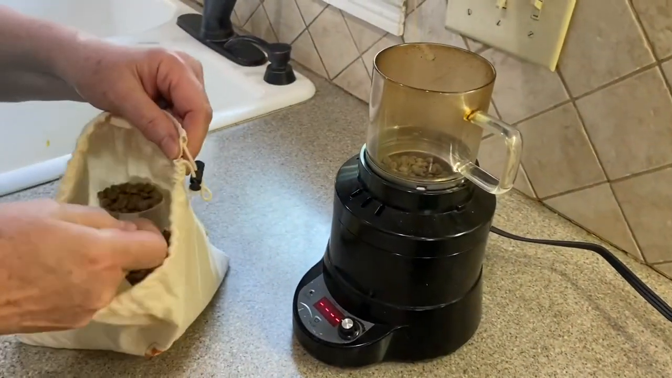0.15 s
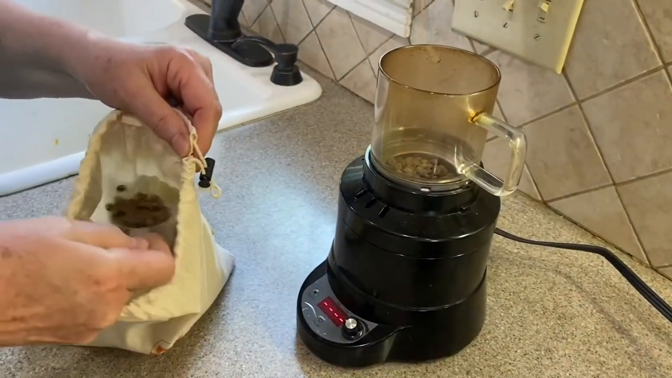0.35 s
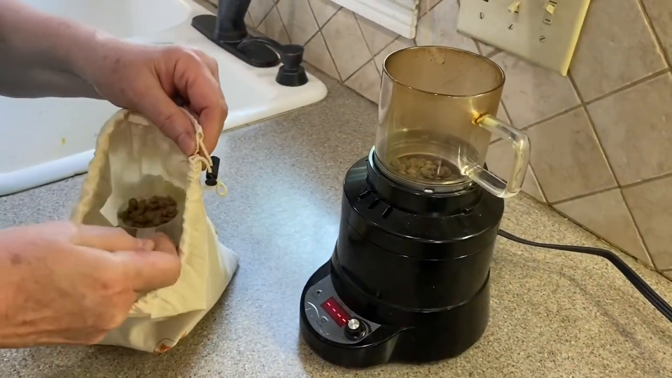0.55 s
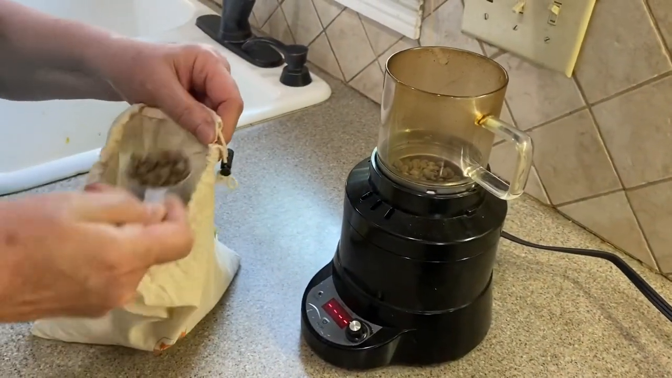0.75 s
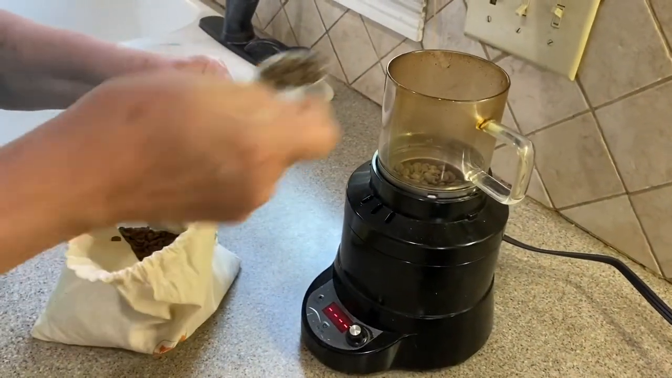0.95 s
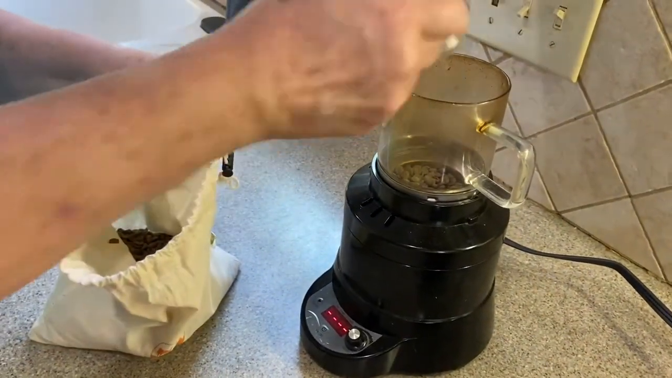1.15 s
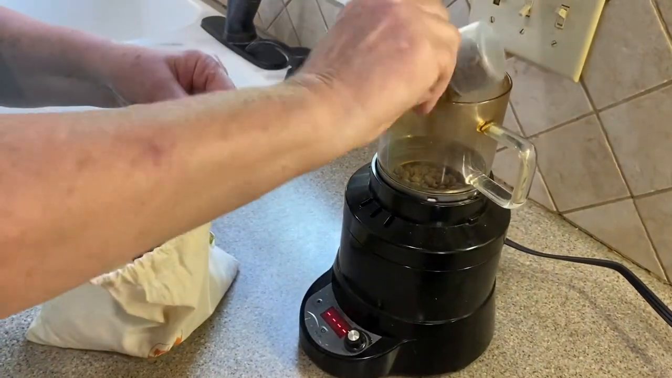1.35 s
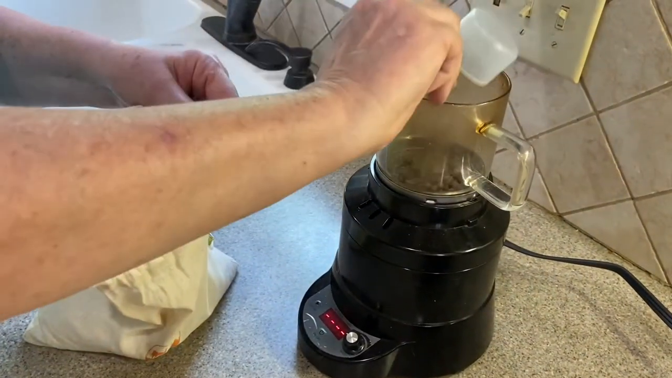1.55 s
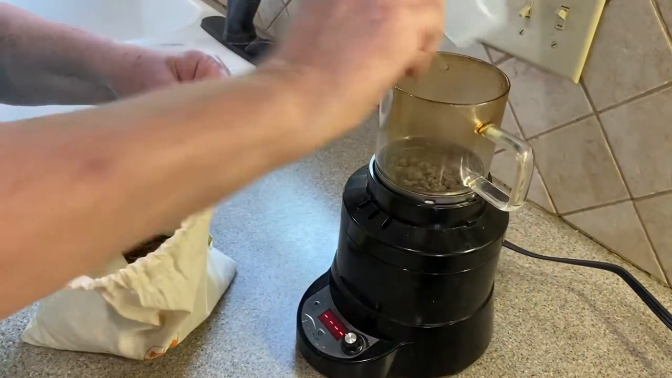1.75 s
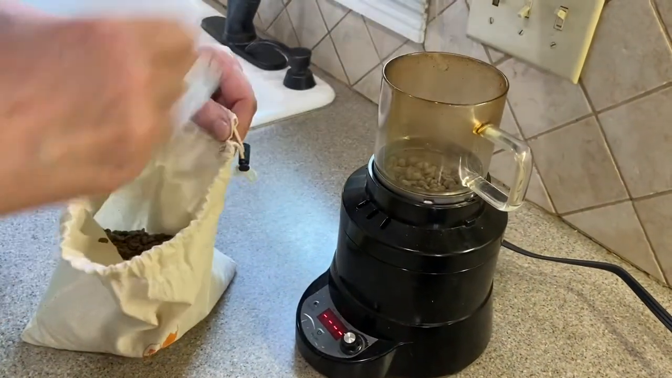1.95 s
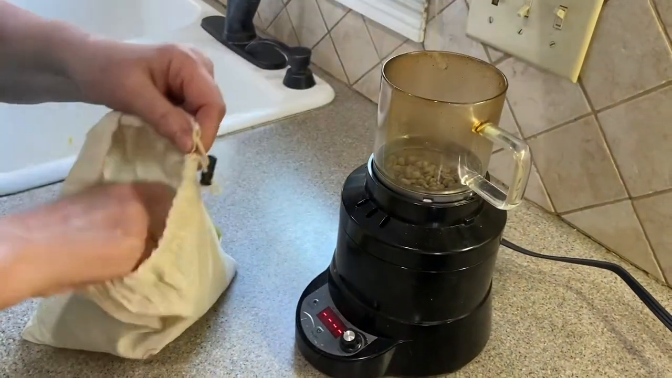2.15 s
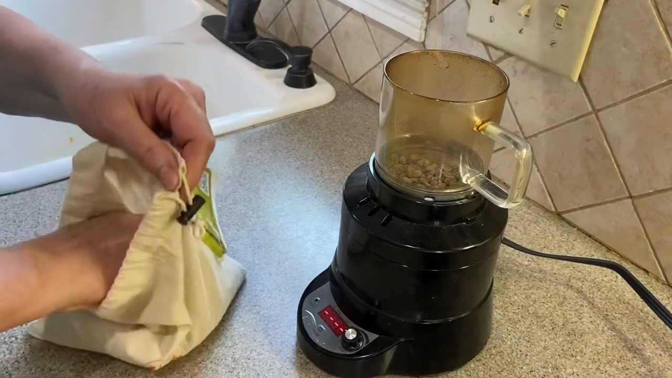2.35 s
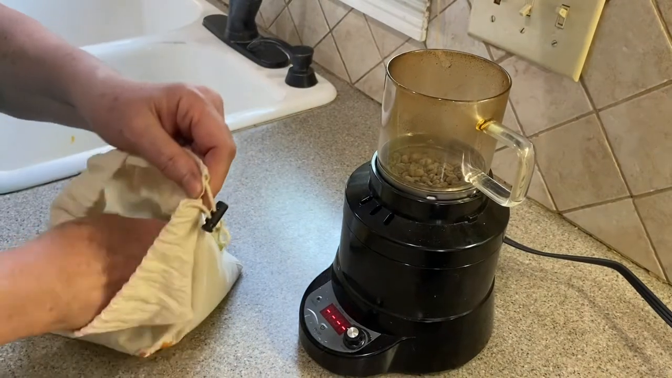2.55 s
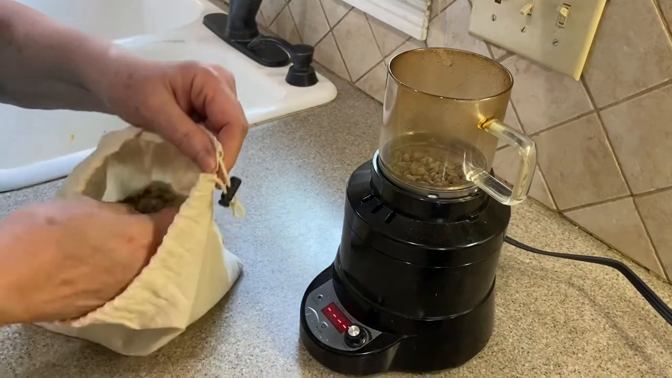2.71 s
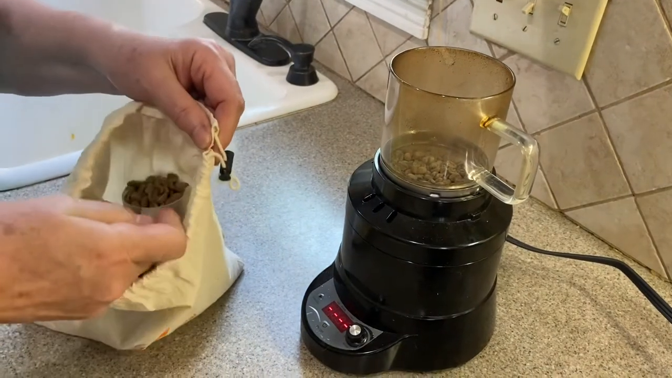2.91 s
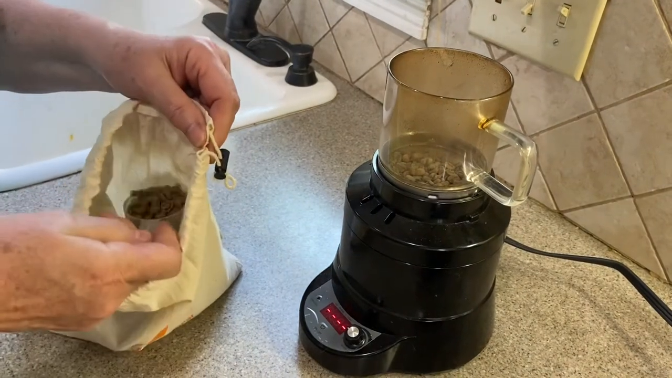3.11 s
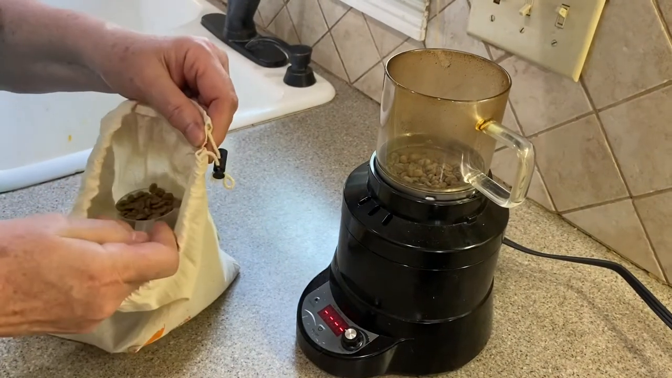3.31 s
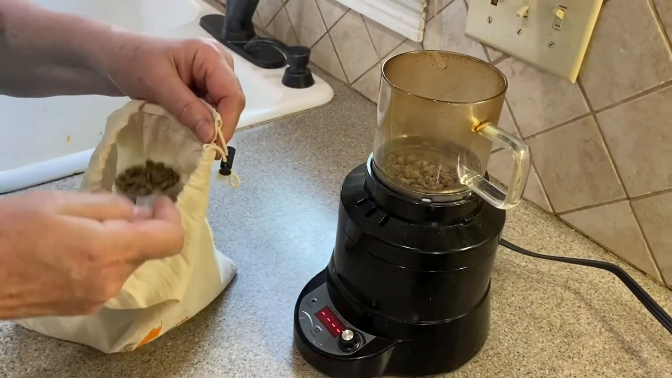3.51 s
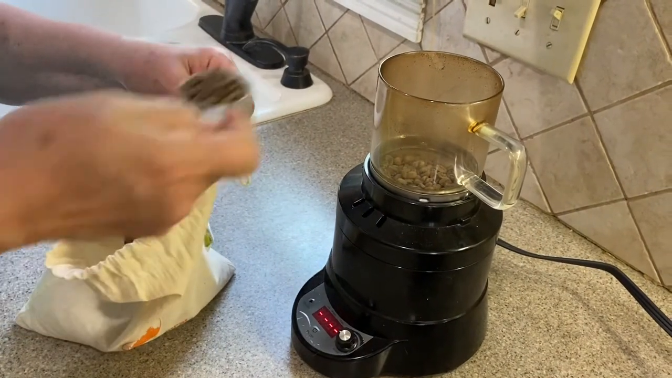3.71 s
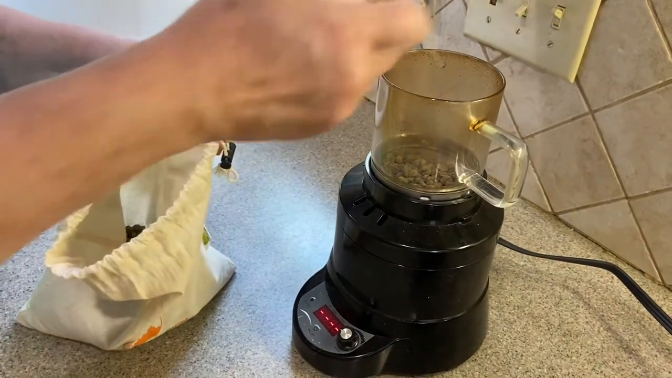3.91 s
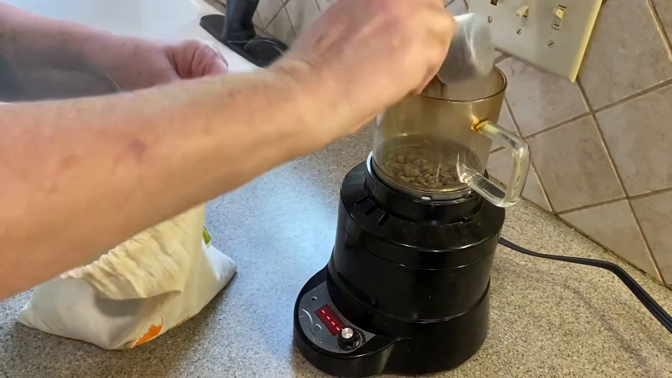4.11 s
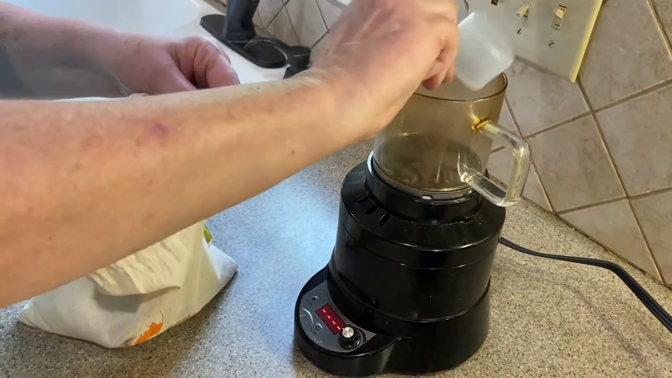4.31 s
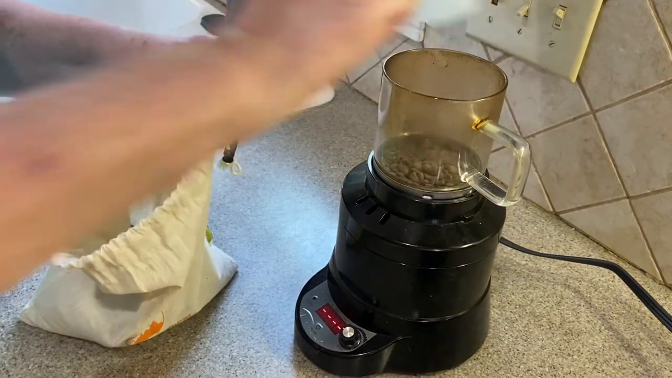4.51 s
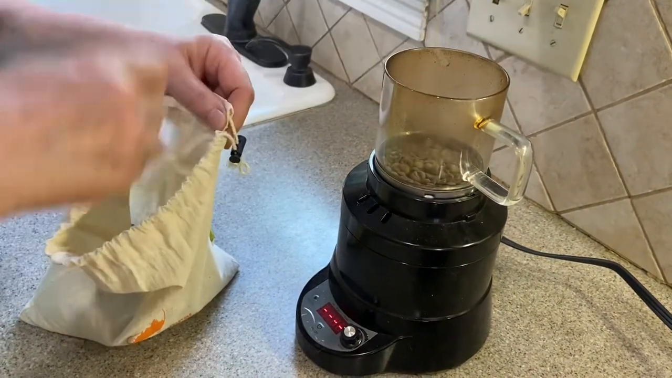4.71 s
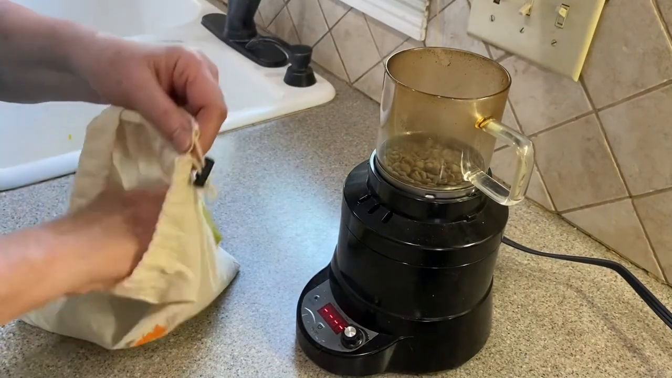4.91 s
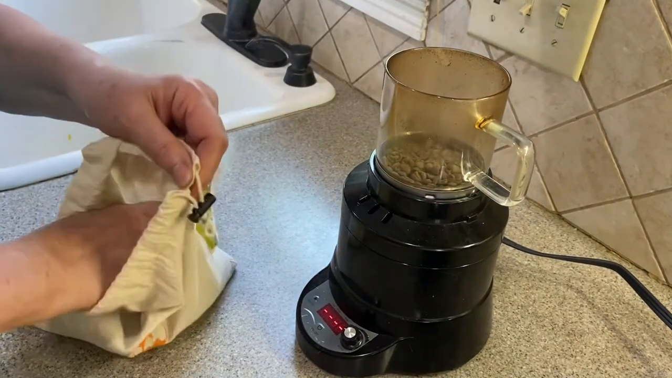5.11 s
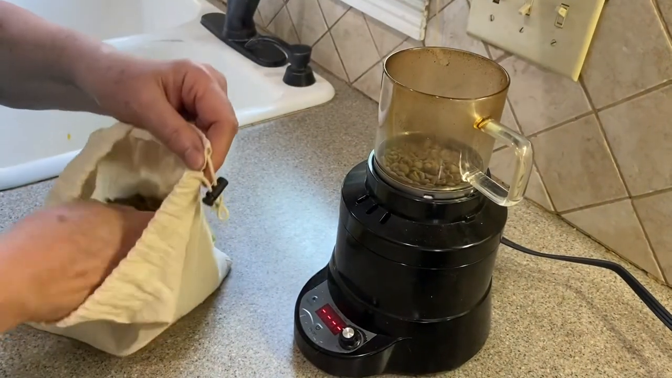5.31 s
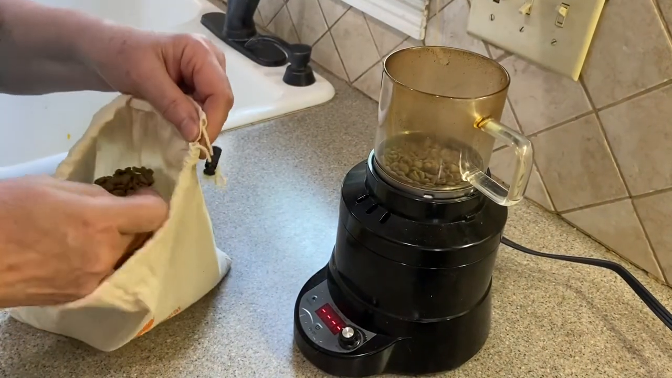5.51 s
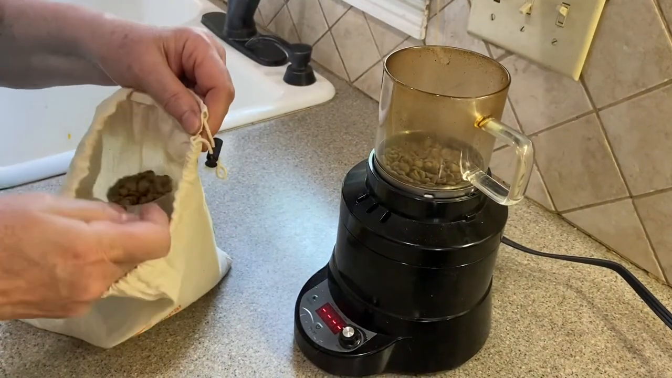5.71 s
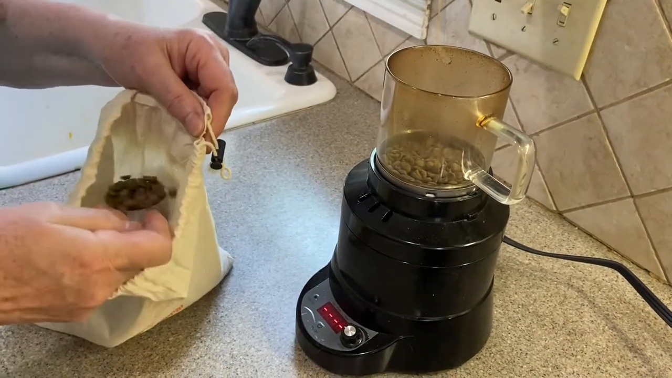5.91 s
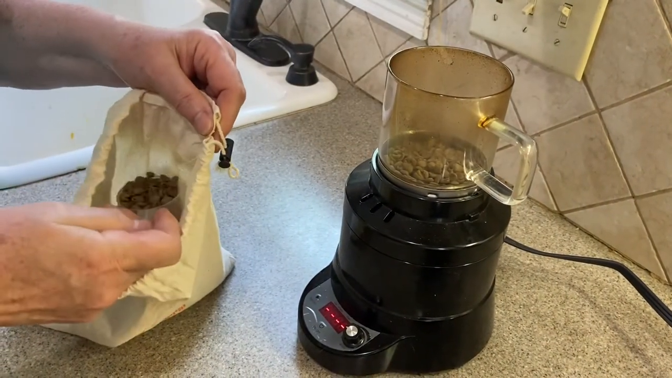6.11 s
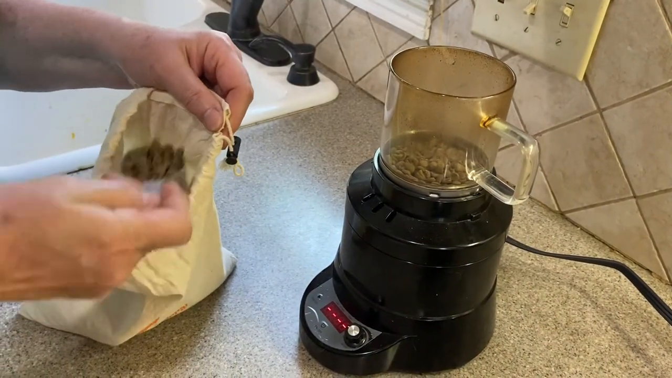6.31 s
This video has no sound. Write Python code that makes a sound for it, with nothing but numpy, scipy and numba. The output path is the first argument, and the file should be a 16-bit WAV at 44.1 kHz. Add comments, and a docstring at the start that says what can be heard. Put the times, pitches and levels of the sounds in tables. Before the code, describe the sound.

Raw coffee beans tick drily as they are shaken off a plastic scoop into a cloth bag. The scoopful gushes into a glass roasting chamber with a short, bright, ringing clatter. The scoop digs back in with a hollow crunch, the bag bumps the counter, and more beans trickle off. A second pour, a second dig and a last shake follow. A fridge hums faintly in the kitchen, heard through a phone microphone.

```python
"""Raw coffee beans in a kitchen, over a humming fridge. Spare beans are shaken off a plastic scoop and
tick back onto the heap in a rustling cloth bag. The scoop tilts and jolts, and at 1.4 s its load gushes
into a glass roasting chamber, ringing the wall. At 2.2 s it digs in with a hollow crunch; the bag bumps
the counter and more beans are shaken off. A second pour comes at 4.2 s, a second dig at 4.9 s, then a
last shake. The room adds a short tail, and all is heard through a phone's two microphone ports."""
import sys
import numpy as np
from scipy import signal
from scipy.fft import rfft, irfft
from scipy.io import wavfile
from numba import njit

SR = 44100
rng = np.random.default_rng(int(sys.argv[2]) if len(sys.argv) > 2 else 0)


def transcribe(signal):
    """Save signal, clipped to [-1, 1], as a 16-bit WAV file at the path in sys.argv[1]."""
    frames = np.atleast_2d(signal).T
    limited = np.clip(frames, -1, 1)
    pcm = np.round(limited * 32767).astype(np.int16)
    wavfile.write(sys.argv[1], SR, pcm)


N = 280255

# Levels in the tables are relative: each layer is filtered and trimmed in its function.
# wavering partials of the fridge: pitch_hz, width_hz, level_db
FRIDGE_HUM = [(57.2, 7.8, -59.5), (90, 4.1, -67.5), (112.7, 3.1, -60), (134, 9.6, -76), (195.5, 19, -67),
              (247.6, 6, -68), (296, 5, -71.5)]
# tone of the room's air: pitch_hz, gain_db
AIR_EQ = [(25, -42), (45, -0.5), (100, -0.5), (300, -9.5), (600, -18.5), (1500, -28.5), (2200, -23),
          (3000, -29.5), (7000, -41), (11000, -54), (16000, -63.5)]

# spare beans are shaken off the scoop: start_s, hold_s, level_db
BEAN_SHAKES = [(0.0, 0.0084, -52), (0.404, 0.026, -47.5), (3.187, 0.088, -49.5), (5.472, 0.011, -56.5),
               (5.86, 0.13, -54), (6.13, 0.031, -59.5)]
# single beans land on the heap: start_s, level_db
BEAN_DROPS = [(0.025, -45.5), (0.1182, -46), (0.2067, -41), (0.2748, -55), (0.299, -36.5), (0.316, -37.5),
              (0.3597, -53), (0.379, -31), (0.4262, -38), (0.4424, -33), (0.47, -37.5), (0.506, -41.5),
              (0.5793, -46), (0.642, -39.5), (0.753, -53), (1.191, -54), (1.229, -41.5), (1.263, -47),
              (1.3092, -36.5), (1.919, -51.5), (2.9164, -40.5), (2.96, -39.5), (2.992, -41.5), (3.014, -39),
              (3.047, -42), (3.106, -47), (3.129, -37), (3.1896, -35), (3.2076, -33), (3.255, -46),
              (3.2942, -34), (3.3536, -45.5), (3.4524, -51), (3.5308, -50), (3.6841, -41.5),
              (3.7426, -47.5), (4.042, -42.5), (4.0755, -64.5), (5.4954, -42), (5.554, -41), (5.605, -47),
              (5.672, -47), (5.6952, -44), (5.706, -42.5), (5.8103, -41.5), (5.8508, -35.5), (5.87, -40),
              (5.9007, -35), (5.914, -41), (5.9412, -35), (6.013, -36), (6.041, -44), (6.0513, -36),
              (6.1837, -36)]
# the cloth brushes against hand and sleeve: peak_s, level_db, fall_db_per_s
CLOTH_BRUSHES = [(0.69, -65, 121), (1.8, -62.5, 47), (3.5, -61.5, 11.5), (4.6, -66, 5.5)]
# the scoop tilts and its load slides to the lip: start_s, hold_s, level_db
SCOOP_TILTS = [(1.231, 0.11, -54.5), (4.08, 0.13, -50.5)]
# tone of the heap's surface and the cloth: pitch_hz, gain_db
HEAP_EQ = [(300, -25), (700, -20.5), (1500, -4.5), (3000, -9.5), (5000, -9), (9000, -3.5), (12000, -6),
           (16500, -20.5)]

# the scoop jolts: start_s, level_db, cup_above_click_db
SCOOP_JOLTS = [(1.338, -34, 7), (2.2044, -38, -14), (2.2516, -39, -8), (2.3025, -34, 11), (2.338, -26, 8),
               (2.359, -22.5, 9), (2.4273, -22.5, -7), (2.4454, -14.5, 2), (2.527, -34, 0),
               (2.538, -28, -17), (2.653, -32.5, 1), (4.9184, -19, -19), (4.931, -19, -10.5),
               (5.033, -36, 6), (5.0773, -34, 16), (5.134, -32, 9), (5.147, -23, -6)]
# the scoop plunges in and beans trickle round it until it lifts: start_s, crunch_db, lift_s, trickle_db
SCOOP_DIGS = [(2.202, -32.5, 2.707, -49), (4.918, -32.5, 5.31, -48)]
# the hand shoves the buried scoop on: start_s, hold_s, level_db, cup_above_crunch_db
SCOOP_SHOVES = [(2.251, .07, -51.5, 8.5), (2.337, .036, -46, 13), (2.397, .02, -44.5, 12),
                (2.436, .03, -34.5, 9), (4.987, .04, -51, 15), (5.029, .145, -38, 10.5),
                (5.28, .025, -51.5, -1)]
# the bag settles on the counter: start_s, level_db
BAG_BUMPS = [(2.649, -30), (2.692, -30)]
# tone of the crunch inside the heap: pitch_hz, gain_db
BURIED_EQ = [(250, -16.5), (700, -17.5), (1500, -9), (3000, -7.5), (5500, -2.5), (9000, 1), (12000, -6.5),
             (16500, -23.5)]
# resonances of the scoop's plastic cup: pitch_hz, width_hz, gain_db
CUP_MODES = [(496, 350, -9), (1142, 230, 0.5), (1241, 13, -7.5), (1423, 81, -3), (1584, 126, 1),
             (1765, 48, 2.5), (1980, 30, -16.5), (2420, 48, -9), (3760, 360, -2.5)]
# low resonances of the counter: pitch_hz, width_hz, gain_db
COUNTER_MODES = [(59.7, 10, -2.5), (117, 35.5, 13.5), (135.7, 13, -16.5), (260, 270, -4.5)]

# beans gush into the chamber: start_s, hold_s, level_db, knock_above_stream_db
POUR_GUSHES = [(1.359, 0.0054, -53.5, 4.5), (1.3746, 0.063, -34, -11), (1.44, 0.13, -29.5, -15.5),
               (4.179, 0.16, -30, -15.5)]
# single beans strike the glass: start_s, level_db
GLASS_HITS = [(1.3743, -16.5), (1.3966, -22), (1.4225, -19), (1.4508, -21), (1.469, -18.5), (1.5002, -19),
              (1.525, -26), (1.558, -25.5), (4.178, -23.5), (4.2301, -22)]
# tone of the clatter in the chamber: pitch_hz, gain_db
CHAMBER_EQ = [(300, -36), (700, -19.5), (1300, -16.5), (2500, -15), (5000, -5.5), (8500, -4), (12000, -5.5),
              (16500, -21)]
# bright resonances of the glass wall: pitch_hz, width_hz, gain_db
WALL_MODES = [(1770, 40, -10), (2400, 28, -8), (2780, 25, -12), (3190, 90, -9), (3940, 40, -5),
              (4230, 50, -9), (4900, 70, -5), (5875, 30, -4), (6620, 90, -7), (7160, 70, -8),
              (7560, 50, -8), (7660, 90, -4), (8230, 80, -10), (8900, 120, -8), (9650, 70, -11),
              (10840, 60, -8), (11900, 60, -12)]
# hollow resonances of the chamber's body: pitch_hz, width_hz, gain_db
BODY_MODES = [(372, 45, -13), (807, 52, -7.5), (843, 35, -3), (954, 120, -7.5), (1760, 320, -6),
              (2380, 110, -7)]

# phase between the microphone ports: pitch_hz, left_lead_rad
PORT_PHASE = [(0, .1), (900, .3), (1500, 1.7), (2300, 0), (3300, .5), (5000, -.5), (6400, 0), (7200, -.2),
              (8700, -3), (9200, -3.2), (10700, -6.1), (11400, -6.4), (12700, -9.3), (13700, -9.5),
              (14900, -12.5), (17000, -12.7)]
# balance between the ports: pitch_hz, left_minus_right_db
PORT_LEVEL = [(300, 0), (1200, 1), (2000, -0.5), (3200, 5), (5200, 5.5), (6800, 1), (16000, 0)]

# envelope slopes (_DB_S) are in dB per second
SHAKE_RISE_DB_S, SHAKE_FALL_DB_S, CLOTH_RISE_DB_S = 69, 93, 55.5
TILT_RISE_DB_S, TILT_FALL_DB_S = 503, 400.5
DIG_RISE_DB_S, PLUNGE_HOLD_S, PLUNGE_FALL_DB_S, PLUNGE_CUP_DB = 8000, 0.0097, 301.5, -12.5
TRICKLE_FALL_DB_S, TRICKLE_CUP_DB, CUP_FALL_DB_S = 67.5, -3.5, 116
SHOVE_RISE_DB_S, SHOVE_FALL_DB_S, FILLING_DB_S = 1598, 503.5, 55.5  # the cup is less hollow as it fills
FULL_CUP_RATIO = 1.35  # the loaded scoop holds less air and sounds higher
GUSH_RISE_DB_S, GUSH_THINS_DB_S, GUSH_FALL_DB_S, KNOCK_FALL_DB_S = 3999.5, 27.5, 194.5, 265
SETTLE_DB, SETTLE_FALL_DB_S = -22.5, 86  # the last beans find their place
AIR_DB, ROOM_DB, ROOM_T60_S, ROOM_TREBLE_T60_S = -62.5, -7, 0.62, 0.14
BAG_PAN_DB, CHAMBER_PAN_DB = -0.5, -1.1  # left minus right
LOW_CUT_HZ, HIGH_CUT_HZ = 42, 16300


def undb(db):
    return 10 ** (np.asarray(db) / 20)


def unit_rms(x):
    return x / np.sqrt(np.mean(x ** 2))


def highpass(x, order, hz):
    return signal.sosfilt(signal.butter(order, hz, "high", fs=SR, output="sos"), x)


def eq_curve_db(table):
    """Join pitch_hz, gain_db points across the spectrum on a log pitch axis."""
    hz, db = np.transpose(table)
    return np.interp(np.log(np.fft.rfftfreq(N, 1 / SR) + 1), np.log(hz), db)


def colour(x, table):
    return irfft(rfft(x) * undb(eq_curve_db(table)), N)


def ring(x, modes, scatter_db=0.):
    """A bank of resonances; the drive of each jumps every 7 ms, so blows ring them unevenly."""
    out = 0
    for hz, width, db in modes:
        r = np.exp(-np.pi * width / SR)
        drive = x * undb(scatter_db * np.repeat(rng.standard_normal(N // 300 + 1), 300)[:N])
        feedback = [1, -2 * r * np.cos(2 * np.pi * hz / SR), r * r]
        out = out + undb(db) * signal.lfilter([1 - r, 0, r - 1], feedback, drive)
    return out


def surge(start_s, hold_s, db, rise_db_s, fall_db_s, sag_db_s=0.):
    """Envelope of gestures: each swells up to its start, sags as it holds, then dies; the loudest wins."""
    start_s, hold_s, db, fall_db_s = (np.reshape(v, (-1, 1)) for v in (start_s, hold_s, db, fall_db_s))
    age_s = np.arange(N) / SR - start_s
    swell = rise_db_s * np.minimum(age_s, 0)
    sag = sag_db_s * np.clip(age_s, 0, hold_s)
    fall = fall_db_s * np.maximum(age_s - hold_s, 0)
    return undb((db + swell - sag - fall).max(axis=0))


def knocks(start_s, db, t60_s, rise_s=0.0013):
    """Envelope of sharp blows: fast attack, exponential decay."""
    blows = np.zeros(N)
    blows[(start_s * SR).astype(int)] = undb(db)
    rise, fall = np.exp(-1 / (rise_s * SR)), np.exp(-np.log(1000) / (t60_s * SR))
    decays = signal.lfilter([1], [1, -fall], blows)
    return signal.lfilter([1 - rise], [1, -rise], decays)


@njit
def pings(start, hz, cycles, size):
    """One damped sine per contact, falling to 1/e in the given number of cycles."""
    out = np.zeros(N)
    for k in range(len(start)):
        step = np.exp((2j * np.pi - 1 / cycles) * hz[k] / SR)
        phasor = size[k] + 0j
        for i in range(start[k], min(N, start[k] + int(6 * cycles * SR / hz[k]))):
            out[i] += phasor.imag
            phasor *= step
    return out


def kitchen():
    """The bed: a wavering fridge hum over room air, centred in the bass and wide above."""
    hum = sum(undb(db) * unit_rms(ring(rng.standard_normal(N), [(hz, width, 0)]))
              for hz, width, db in FRIDGE_HUM)
    mid, side = (unit_rms(colour(rng.standard_normal(N), AIR_EQ)) for _ in range(2))
    side = 1.07 * highpass(side, order=1, hz=500) * np.array([[1], [-1]])
    return hum + undb(AIR_DB) * (mid + side)


def bounces(start_s, db, hz, spacing_s, fall_db, cycles, count=6):
    """A bean lands and rattles to rest: a few pings near its pitch, each fainter than the last."""
    gap, detune = rng.random((len(start_s), count, 2)).transpose(2, 0, 1)
    delay_s = spacing_s * (np.cumsum(gap, axis=1) - gap[:, :1])
    start = ((start_s[:, None] + delay_s) * SR).astype(np.int64)
    pitch_hz = np.minimum(hz[:, None] * 2 ** (1.81 * (detune - .3)), 16000)
    size = undb(db[:, None] - fall_db * np.arange(count))
    return pings(start.ravel(), pitch_hz.ravel(), cycles, size.ravel())


def clatter(count, spread_db, cycles):
    """Bean against bean at random moments: many faint ticks, a few strong ones, each at its own pitch."""
    when, pitch, chance = rng.random((count, 3)).T
    hz = 600 * 27 ** pitch  # 600 Hz to 16 kHz
    size = undb(spread_db * np.minimum(-np.log(chance), 4.5)) * hz / SR
    return unit_rms(pings((when * N).astype(np.int64), hz, cycles, size))


def loose_beans():
    """Beans tick drily on the heap one by one, and slide in clumps as the scoop shakes or tilts."""
    start_s, db = np.transpose(BEAN_DROPS)
    cracks = rng.standard_normal(N) * knocks(start_s, db - 3, t60_s=0.044, rise_s=0.00067)
    drop_hz = 3500 * 2.4 ** rng.random(len(start_s))
    rattles = bounces(start_s, db + 7, drop_hz, spacing_s=.003, fall_db=3.5, cycles=3.7)
    when, chance, pitch = rng.random((1000, 3)).T
    clump_db, clump_hz = np.minimum(-2.8 * np.log(chance), 7), 3500 * 2.6 ** pitch
    clumps = bounces(when * N / SR, clump_db, clump_hz, spacing_s=.0025, fall_db=0.5, cycles=1.36)
    slide = undb(1) * unit_rms(clumps) + undb(-0.5) * clatter(count=12000, spread_db=4, cycles=0.27)
    shaking = surge(*np.transpose(BEAN_SHAKES), SHAKE_RISE_DB_S, SHAKE_FALL_DB_S)
    tilting = surge(*np.transpose(SCOOP_TILTS), TILT_RISE_DB_S, TILT_FALL_DB_S)
    return undb(4.5) * colour(cracks + rattles + slide * np.maximum(shaking, tilting), HEAP_EQ)


def cloth():
    """The bag brushes hand and sleeve in soft swells of noise."""
    peak_s, db, fall_db_s = np.transpose(CLOTH_BRUSHES)
    brushing = surge(peak_s, 0, db, CLOTH_RISE_DB_S, fall_db_s)
    return undb(-2.5) * colour(rng.standard_normal(N) * brushing, HEAP_EQ)


def digging():
    """Envelopes of the crunch, the hollow cup and the loaded cup through plunge, shoves and lift."""
    start_s, db, lift_s, trickle_db = np.transpose(SCOOP_DIGS)
    plunge = surge(start_s, PLUNGE_HOLD_S, db, DIG_RISE_DB_S, PLUNGE_FALL_DB_S)
    trickle = surge(start_s, lift_s - start_s, trickle_db, DIG_RISE_DB_S, TRICKLE_FALL_DB_S)
    loaded = surge(start_s, lift_s - start_s, trickle_db + TRICKLE_CUP_DB, DIG_RISE_DB_S, CUP_FALL_DB_S)
    start_s, hold_s, db, cup_db = np.transpose(SCOOP_SHOVES)
    shove = surge(start_s, hold_s, db, SHOVE_RISE_DB_S, SHOVE_FALL_DB_S)
    cup = surge(start_s, hold_s, db + cup_db, SHOVE_RISE_DB_S, SHOVE_FALL_DB_S, FILLING_DB_S)
    crunch = np.max([plunge, trickle, shove], axis=0)
    return crunch, np.maximum(cup, undb(PLUNGE_CUP_DB) * plunge), loaded


def scoop():
    """The scoop jolts and crunches through the heap; its hollow cup and the counter sound along."""
    crunch, hollow, loaded = digging()
    start_s, db, cup_db = np.transpose(SCOOP_JOLTS)
    noise = rng.standard_normal((2, N))
    clicks = noise[0] * knocks(start_s, db - 4.5, t60_s=0.024)
    ticks = clatter(count=30000, spread_db=3.5, cycles=0.56) * crunch + clicks
    rub = clatter(count=40000, spread_db=1, cycles=0.89)
    cup_drive = rub * hollow + noise[1] * knocks(start_s, db + cup_db - 5.5, t60_s=0.038, rise_s=0.0032)
    bumps = noise[0] * knocks(*np.transpose(BAG_BUMPS), t60_s=0.026)
    thud = ring(undb(-6) * cup_drive + undb(-2.5) * bumps, COUNTER_MODES)
    full_modes = np.array(CUP_MODES) * [FULL_CUP_RATIO, FULL_CUP_RATIO, 1]
    cavity = ring(cup_drive, CUP_MODES, scatter_db=4) + ring(rub * loaded, full_modes, scatter_db=4)
    cup = undb(-4.5) * cavity + ring(cavity, [(1500, 1010, 0)])  # the cup's mouth favours the mids
    return undb(6) * colour(ticks, BURIED_EQ) + undb(6.5) * cup + undb(5.5) * thud


def pouring():
    """Envelopes of the stream with its settling tail, and of the hollow knock under it."""
    start_s, hold_s, db, knock_db = np.transpose(POUR_GUSHES)
    gush = surge(start_s, hold_s, db, GUSH_RISE_DB_S, GUSH_FALL_DB_S, GUSH_THINS_DB_S)
    settle = surge(start_s, hold_s, db + SETTLE_DB, GUSH_RISE_DB_S, SETTLE_FALL_DB_S)
    knock = surge(start_s, hold_s, db + knock_db, GUSH_RISE_DB_S, KNOCK_FALL_DB_S, GUSH_THINS_DB_S)
    return np.maximum(gush, settle), knock


def chamber():
    """Falling beans crack on those below and ring the glass wall; their weight thuds into the base."""
    stream, knock = pouring()
    start_s, db = np.transpose(GLASS_HITS)
    noise = rng.standard_normal((2, N))
    hits = noise[0] * knocks(start_s, db - 1, t60_s=0.038)
    ticks = clatter(count=24000, spread_db=2, cycles=1.0) * stream + hits
    # each spot of wall and floor plate tinkles briefly at a pitch of its own
    tinkle = clatter(count=9000, spread_db=1, cycles=67.0) * stream
    weight = clatter(count=20000, spread_db=2, cycles=1.9) * knock
    thud = unit_rms(ring(noise[1], COUNTER_MODES)) * knock
    wall = ring(ticks, WALL_MODES, scatter_db=6)
    body = ring(weight, BODY_MODES, scatter_db=4)
    rattle = colour(undb(5.5) * ticks + undb(4) * tinkle, CHAMBER_EQ)
    return rattle + undb(7) * wall + undb(18) * body + undb(-3) * thud


def room(x):
    """Tiles and cupboards answer with a noisy tail whose treble dies first."""
    t = np.arange(SR) / SR
    shared = rng.standard_normal(SR)
    own = highpass(rng.standard_normal((2, SR)), order=1, hz=400)  # close ports share their bass
    lowpass = signal.butter(2, 5500, fs=SR, output="sos")
    low = signal.sosfilt(lowpass, shared + own * [[1.1], [1.31]])
    # the treble the ports share arrives from the wall behind the counter
    high = shared - signal.sosfilt(lowpass, shared) + 1.4 * own
    tail = low * undb(-60 * t / ROOM_T60_S) + 1.82 * high * undb(-60 * t / ROOM_TREBLE_T60_S)
    tail *= np.minimum(t / 0.00096, 1)  # 1 ms fade-in
    tail /= np.sqrt(np.sum(tail ** 2) / 2)
    return signal.fftconvolve(x[None], tail, axes=1)[:, :N]


def scene():
    """Bag and chamber sit near the centre, with the room's tail and the kitchen bed around them."""
    heap, glass = scoop() + loose_beans() + cloth(), chamber()
    sides = np.array([[.5], [-.5]])
    direct = heap * undb(BAG_PAN_DB * sides) + glass * undb(CHAMBER_PAN_DB * sides)
    return direct + undb(ROOM_DB) * room(heap + glass) + kitchen()


def record(dry):
    """The two ports differ in phase and level with pitch; rumble and extreme top are cut."""
    lead_rad = np.interp(np.fft.rfftfreq(N, 1 / SR), *np.transpose(PORT_PHASE))
    left = np.exp(.5j * lead_rad) * undb(eq_curve_db(PORT_LEVEL) / 2)  # each port takes half
    ports = irfft(rfft(dry) * np.array([left, 1 / left]), N)
    ports = highpass(ports, order=3, hz=LOW_CUT_HZ)
    return signal.sosfilt(signal.ellip(10, .2, 80, HIGH_CUT_HZ, fs=SR, output="sos"), ports)


dry = scene()
out = record(dry)
transcribe(out)
```